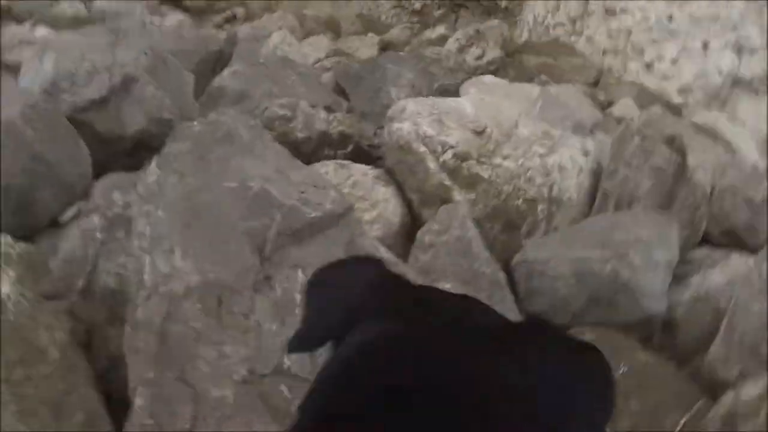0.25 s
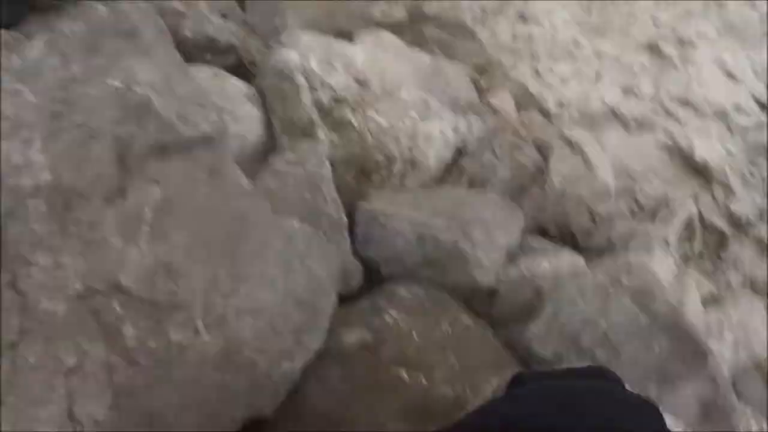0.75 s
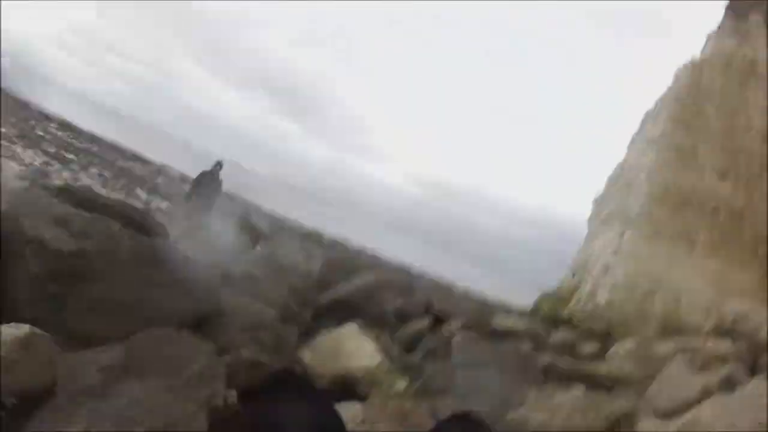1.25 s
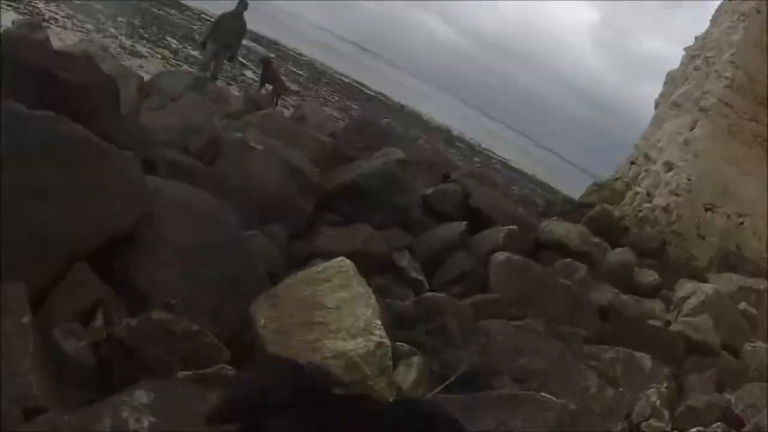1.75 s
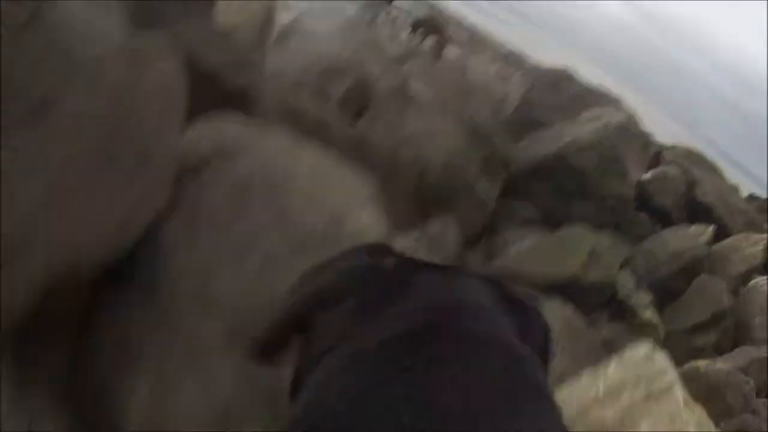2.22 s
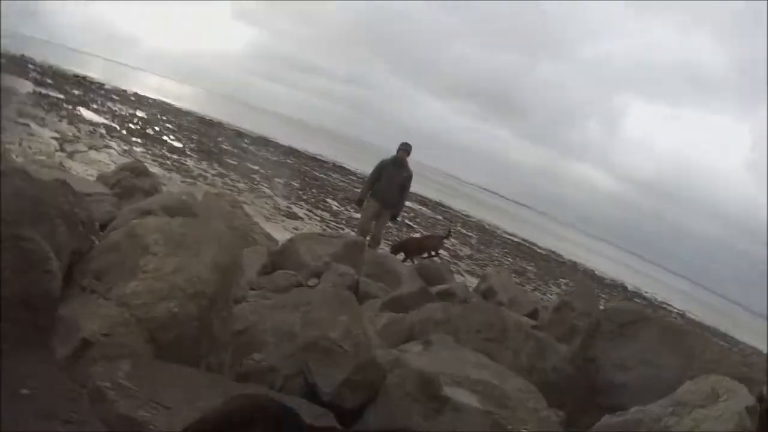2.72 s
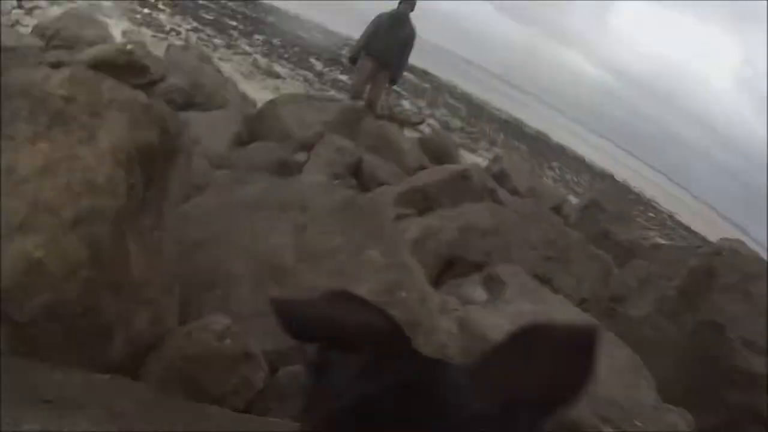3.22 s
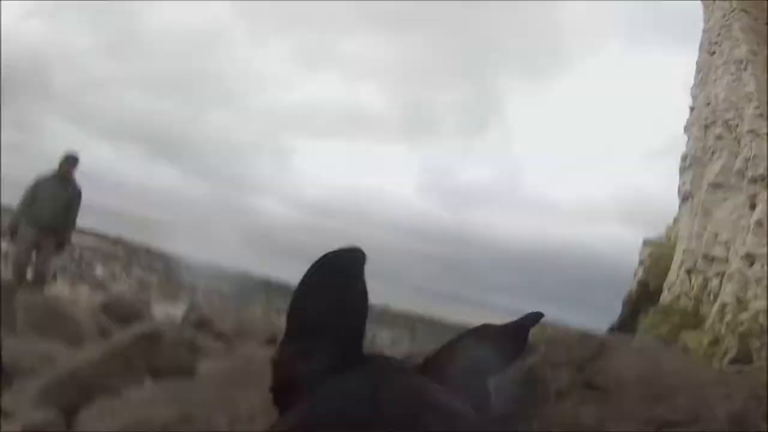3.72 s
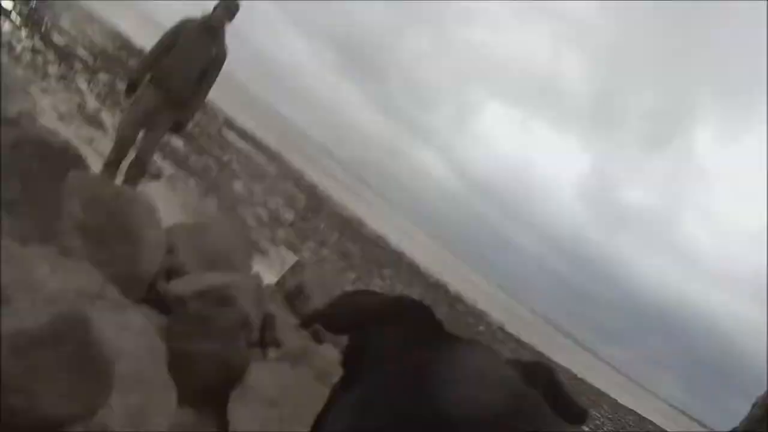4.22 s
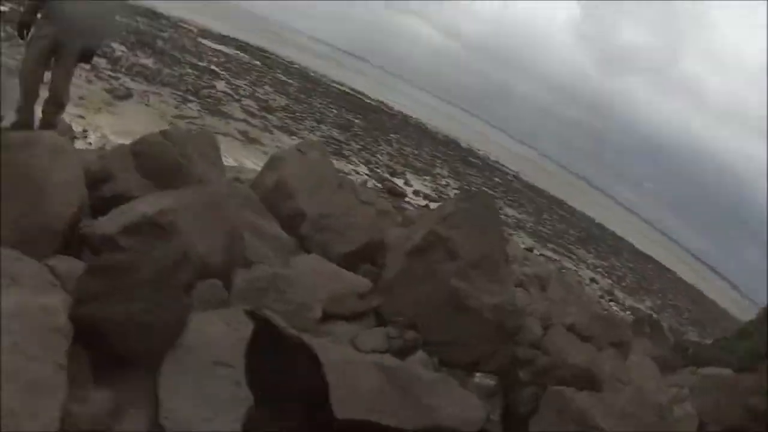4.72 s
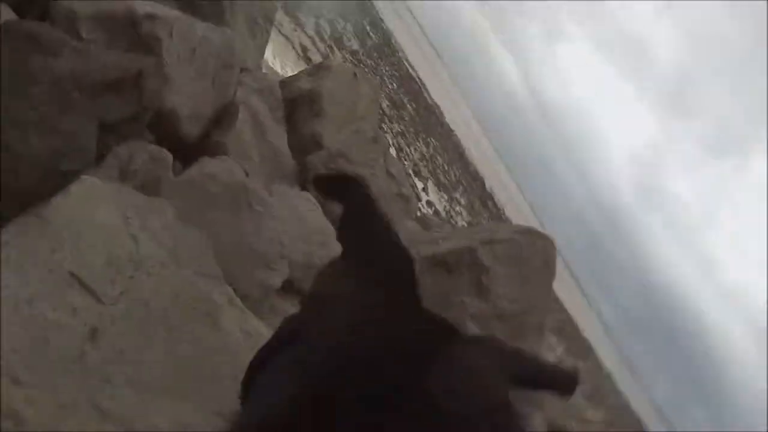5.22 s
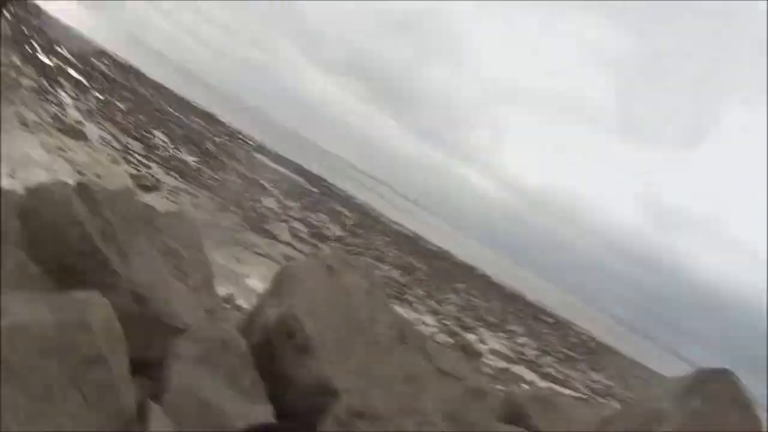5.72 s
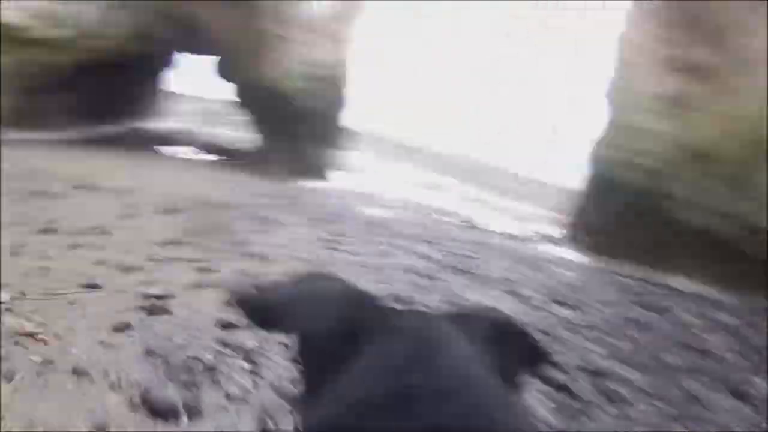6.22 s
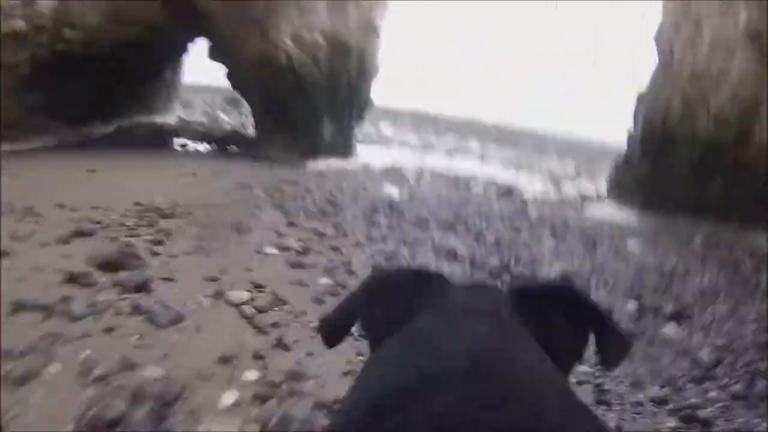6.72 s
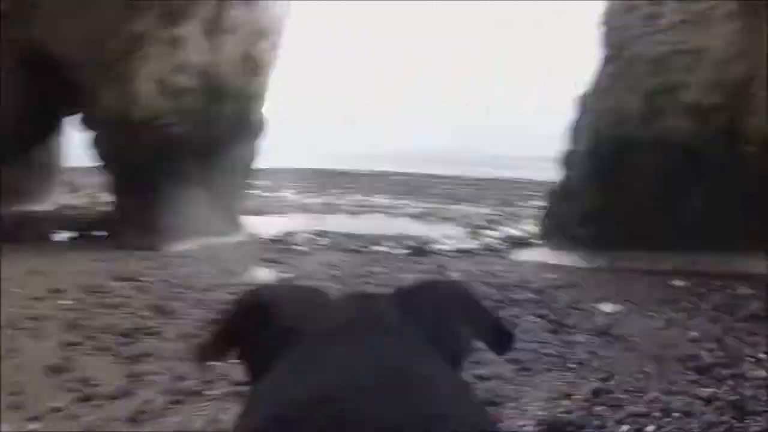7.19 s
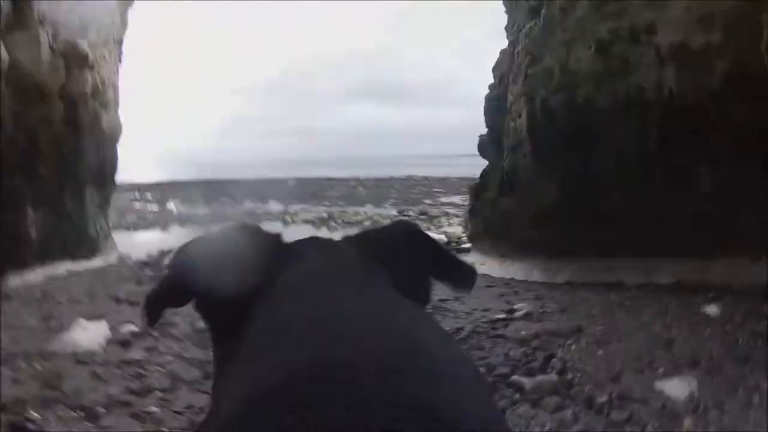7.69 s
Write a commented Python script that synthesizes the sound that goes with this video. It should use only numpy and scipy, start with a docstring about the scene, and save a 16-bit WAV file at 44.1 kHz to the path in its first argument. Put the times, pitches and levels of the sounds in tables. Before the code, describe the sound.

A camera in a plastic housing on a running dog's harness thumps deep and uneven, with knocks, clicks and strap rubbing, broken by two brief dropouts.

```python
"""On boulders, then shingle: a dog runs with a camera in a closed housing riding on its harness.
Each stride thumps the housing as a damped low swing; the mount knocks as pressure cusps with a hollow ring,
and loose plastic clicks as bursts of resonant taps. Fur and straps rub as coloured stick-slip grains.
A slow start with sway, rustle and fading hiss comes first; pebbles clack late as short pitched noise.
Twice the level dips briefly."""
import sys
import numpy as np
from scipy import signal
from scipy.fft import rfft, irfft
from scipy.io import wavfile
from scipy.ndimage import uniform_filter1d

SR = 44100
rng = np.random.default_rng(int(sys.argv[2]) if len(sys.argv) > 2 else 0)


def unload_audio(sound):
    """Save the sound as a 16-bit wav file, at the path given as the first command line argument."""
    columns = np.transpose(np.atleast_2d(sound))
    # keep every value between -1 and 1, then stretch to whole-number steps
    steps = np.round(np.clip(columns, -1, 1) * 32767)
    wavfile.write(sys.argv[1], SR, steps.astype(np.int16))


N = 350595
TIME = np.arange(N) / SR

# Jolts of the housing: [crest t/s, peak level/dB, swing f/Hz, cycles for the load to fall to 0.4]
JOLTS = [(0.290, -30.5, 77, 0.83), (0.371, -33, 86, 0.62), (1.269, -25.5, 25, 0.27),
         (1.347, -16.5, 48.5, 2), (1.773, -8.5, 35.4, .8), (1.795, -28, 110, 1.1), (1.86, -31.5, 117, 4.1),
         (2.237, -2.5, 40.6, 0.95), (2.27, -5, 52, 0.3), (2.312, -16.5, 75, 0.96), (2.468, -31, 110, 1.1),
         (2.474, -18, 27, 0.85), (2.571, -20.5, 109, 0.85), (2.721, -13, 43.6, 0.82),
         (2.936, -22.5, 91, 0.8), (2.955, -13.5, 21, 1), (3.193, 0.5, 30.7, 0.44), (3.338, -7.5, 31, .7),
         (3.375, -8.5, 31.5, 0.55), (3.585, -16.5, 47.6, 1.74), (3.605, -29, 104, 0.97),
         (3.728, -19.5, 22.2, 2.8), (3.897, 0, 41.5, 0.76), (4.032, -18, 84, 1.45), (4.118, -20.5, 50, .6),
         (4.146, -37, 195, 1.2), (4.175, -18, 42, 0.5), (4.412, -29, 102, 2.2), (4.532, -4.5, 35.8, 0.6),
         (4.555, -24, 110, 1.6), (4.597, -13.5, 46.6, 0.86), (4.893, -6.5, 51, 0.85),
         (4.963, -14, 31, 0.31), (5.392, -27.5, 122, 3.7), (5.404, -8.5, 51.5, 0.59),
         (5.656, -21, 24.5, 0.72), (6.271, -40, 122, 0.77), (6.468, -23, 22.7, 1.04),
         (6.672, -20.5, 101, 0.76), (6.676, -10.5, 23.6, 1.07), (6.861, -15.5, 20.2, 2.1),
         (7.082, -5.5, 30, 0.5), (7.266, -9.5, 19, 1.6), (7.488, -5.5, 34.4, 0.77), (7.713, -4, 26, 1.08),
         (7.941, 0, 30, 1.3)]
# Scuff of the straps under a jolt, relative spectrum: [f/Hz, level/dB per Hz]
SCUFF_SPECTRUM = [(40, -17), (130, 10.5), (200, -17), (400, -7.5), (800, -23.5), (1400, -14.5),
                  (3000, -22.5), (15000, -59.5)]
# Pace of the run, before load and trims: [t/s, shaking level/dB, rubbing level/dB, fine friction level/dB]
PACE = [(1.0, -54, -86.5, -103), (1.16, -43.5, -73, -85), (1.26, -40, -65.5, -83),
        (1.45, -37.5, -65.5, -82), (1.72, -33, -54, -72), (1.92, -36.5, -52.5, -72.5),
        (2.14, -36.5, -59, -71.5), (2.38, -33, -65, -77), (2.62, -30, -57.5, -73.5), (2.9, -26.5, -54, -68),
        (3.3, -30, -53, -67.5), (3.82, -29.5, -56.5, -67.5), (4.0, -33, -61, -76), (4.27, -30, -59, -70.5),
        (4.5, -27, -54, -68), (5.1, -33, -57, -72), (5.93, -40.5, -66, -80), (6.05, -60, -74.5, -100),
        (6.2, -58, -89, -101), (6.29, -44.5, -77.5, -82.5), (6.47, -40, -64.5, -75.5),
        (7.1, -26.5, -54.5, -66), (7.65, -30, -56, -66.5), (7.89, -31.5, -60, -67)]
# Fur and straps drag harder on the shell, around and between landings:
# [peak t/s, level/dB above steady rubbing, t/s to 1/e]
DRAGS = [(1.25, 3, 0.021), (1.342, 5.5, 0.03), (1.81, 1.5, 0.13), (2.17, 10, 0.075), (2.39, 6.5, 0.062),
         (2.586, 5.5, 0.032), (2.70, 2, 0.0089), (2.917, 2.5, 0.018), (3.408, 2, 0.0085), (3.57, 3, 0.028),
         (3.85, 9.5, 0.028), (4.188, 4, 0.011), (4.337, 1, .01), (4.933, 3.5, 0.0092), (5.425, 4, 0.055),
         (5.654, 5.5, 0.012), (6.28, 8, .04), (6.891, 5.5, 0.021), (7.237, 3.5, 0.02), (7.492, 5, 0.016),
         (7.727, 3.5, 0.18)]
# Body shake, relative spectrum: [f/Hz, level/dB per Hz]
SHAKE_SPECTRUM = [(8, -21), (20, 4.5), (30, 3.5), (55, -4.5), (90, -12.5), (125, -17.5), (170, -27.5),
                  (250, -39), (500, -57.5), (1500, -100)]
# Rubbing on the hollow shell, relative spectrum: [f/Hz, level/dB per Hz]
RUB_SPECTRUM = [(100, -6.5), (250, -2), (450, -3.5), (750, -8), (1060, -10), (1250, 2), (1480, -0.5),
                (1750, -8), (2250, -2.5), (2800, -17), (3600, -22.5), (5000, -28), (15000, -65)]
# Fine friction, relative spectrum: [f/Hz, level/dB per Hz]
FRICTION_SPECTRUM = [(1500, -26.5), (3400, 3.5), (4300, -2), (4900, -1), (6100, -8), (7000, -5),
                     (8300, -10), (10000, -11), (11800, -14), (13200, -17.5), (15500, -32.5)]
# Straps slide over the shell as a stride lands: [peak t/s, level/dB, build-up t/s from 1/e]
SLIDES = [(1.358, -63.5, .045), (1.765, -64, 0.023), (2.205, -54, 0.033), (3.886, -51.5, 0.025),
          (7.020, -61, .015), (7.063, -56, 0.03), (7.500, -66, 0.011)]
# Strap slide, relative spectrum: [f/Hz, level/dB per Hz]
SLIDE_SPECTRUM = [(600, -19), (1400, -2.5), (2300, 8), (2900, -3.5), (3600, 3.5), (4300, -1.5),
                  (4900, -6.5), (6500, -17), (13000, -30.5)]
# Knocks of the mount: [t/s, push level/dB, hollow ring level/dB]
KNOCKS = [(1.040, -52, -65), (1.049, -49, -60), (1.074, -43, -63), (1.241, -43, -56), (1.369, -31.5, -44),
          (1.375, -27.5, -61), (1.792, -26, -43), (2.2198, -18.5, -65), (2.238, -25, -36),
          (2.264, -34, -45), (2.27, -24.5, -39.5), (2.5669, -33, -34.5), (2.694, -43, -42),
          (2.721, -26, -60), (3.215, -32, -38), (3.336, -55, -34.5), (3.398, -50, -35.5), (3.884, -8, -35),
          (3.898, -21.5, -34), (4.342, -47, -46), (4.531, -40, -37), (4.915, -28, -38), (5.39, -37, -42),
          (5.413, -27, -49), (5.641, -46, -45.5), (6.672, -23, -31), (7.007, -54, -38.5), (7.068, -25, -35),
          (7.484, -23.5, -33), (7.938, -20, -29)]
# Shell modes in a knock, relative levels before scatter: [f/Hz, level/dB, t60 t/s]
KNOCK_MODES = [(1292, 1.5, 0.02), (1472, -6.5, 0.021), (1480, -19.5, 0.0079), (2060, -8.5, 0.0066)]
# Click bursts of the buckle and hinge: [t/s, first tap level/dB before trim, burst length t/s]
CLICKS = [(1.039, -67, .004), (1.072, -61, .004), (1.238, -53.5, .013), (1.372, -52, .004),
          (1.777, -54, .004), (2.2304, -46, .004), (2.237, -43, .013), (2.2667, -41.5, .013),
          (2.432, -51, .004), (2.476, -45.5, .004), (2.725, -39, .022), (2.9592, -46, .004),
          (3.036, -41, .004), (3.0525, -39.5, .004), (3.2017, -31, .004), (3.211, -32, .004),
          (3.6265, -44.5, .022), (3.7287, -33.5, .031), (3.8943, -36, .004), (4.338, -44.5, .013),
          (4.4666, -42.5, .013), (4.7331, -40.5, .004), (4.784, -44.5, .004), (4.937, -47.5, .004),
          (5.03, -48.5, .004), (5.5615, -51, .004), (6.3695, -62, .004), (6.8834, -44, .004),
          (6.9698, -48, .004), (7.091, -46, .022), (7.275, -47.5, .013), (7.519, -43.5, .004),
          (7.555, -36, .004), (7.7225, -44.5, .004), (7.934, -32, .004)]
# Shell modes in a click, relative levels before scatter: [f/Hz, width f/Hz, level/dB]
CLICK_MODES = [(2165, 135, 11.5), (3590, 1030, -4), (4830, 154, 3), (5250, 510, -2.5), (7050, 400, -3.5),
               (8840, 1500, -15), (11370, 1200, -6.5)]
# Pebbles clack under the paws: [t/s, starting level/dB, pitch f/Hz, decay t/s to 1/e]
PEBBLES = [(7.006, -51, 4860, 0.0045), (7.051, -49.5, 4750, 0.0064), (7.215, -58, 4630, 0.0046),
           (7.229, -49.5, 4670, 0.0062), (7.397, -42, 7850, 0.0013), (7.467, -43.5, 4340, 0.0033)]
# Sway before the run, coming to rest: [t/s, shaking level/dB]
SWAY = [(0.03, -35), (.2, -49), (.38, -39), (.52, -62), (.9, -69.5)]
# Harness rustles in the slow first steps: [peak t/s, level/dB, t/s to 1/e]
RUSTLES = [(0.123, -68, 0.092), (0.294, -64.5, 0.024), (.40, -76.5, 0.11), (.58, -71, 0.055)]
# Harness rustle, relative spectrum: [f/Hz, level/dB per Hz]
RUSTLE_SPECTRUM = [(120, -4), (300, -14), (700, -10), (1400, -17), (1850, -1), (2150, -6), (2500, -15),
                   (3100, -3.5), (4000, -22), (6500, -23), (9000, -29), (15000, -34)]
# Air around the housing, relative spectrum: [f/Hz, level/dB per Hz]
AIR_SPECTRUM = [(100, -3.5), (250, 0), (700, -10), (1400, -13.5), (2000, -10.5), (3100, -15.5), (4200, -20),
                (7000, -26), (15000, -37)]
# Brief dips in level: [start t/s, end t/s]
DIPS = [(0.911, 1.003), (6.118, 6.205)]

# after each jolt the housing drops back once, lighter and quicker
REBOUND_S, REBOUND_DB, REBOUND_FREQ_RATIO = 0.031, -15, 1.15
# the harness tightens as the weight comes down and lets go; a second, slack swell is subtracted
TIGHTEN_S, LET_GO_S, SLACK_SHIFT_S, SLACK_S, SLACK_SHARE = 0.03, 0.04, 0.096, 0.043, 0.19
LOAD_POWER = 0.67  # the load on the harness grows more slowly than the jolt
# within a burst the parts chatter, each tap weaker than the last
CHATTER_GAP_S, CHATTER_FADE_DB_PER_S = 0.009, 399.5
# the hiss of air fades steadily through the slow start
AIR_DB, AIR_FADE_DB_PER_S = -66, 24.5
BAND_EDGE_HZ = 15800


def jolts(lead_cycles=0.22, rise_s=0.0012, jolt_db=0, scuff_db=-40):
    """The housing swings on its harness, rebounds once and settles; the straps scuff as it does."""
    swing, strain = np.zeros(N), np.zeros(N)
    before = 0.1  # seconds computed ahead of the crest
    t = np.arange(SR // 2) / SR - before
    rebounds = [(s + REBOUND_S, db + REBOUND_DB, hz * REBOUND_FREQ_RATIO, cycles)
                for s, db, hz, cycles in JOLTS]
    for s, db, hz, cycles in JOLTS + rebounds:
        # the load comes on part of a cycle before the crest, then dies away
        onset = (1 + np.tanh((t + lead_cycles / hz) / (2 * rise_s))) / 2
        load = amp(db) * onset / np.cosh(t * hz / cycles * 1.59)
        add(swing, s - before, load * np.cos(2 * np.pi * hz * t))
        add(strain, s - before, load)
    scuff = strain * coloured(slips(1500, 3.8), SCUFF_SPECTRUM)
    return amp(jolt_db) * swing + amp(scuff_db) * scuff


def running(shake_db=0, rub_db=1.24, friction_db=0, flutter_db=0.9, lurch_db=3.0, wobble_db=1.5,
            shake_load_db=7, rub_load_db=6, friction_load_db=3):
    """The body shakes the camera while fur and straps drag over the hollow shell, all harder under load."""
    shake, rub, friction = levels(PACE)
    load = harness_load()
    drag_db = sum(db * swell(s, half, half) for s, db, half in DRAGS)
    grip = amp(flutter_db * wander(38))  # contact pressure flutters
    lurch = wander(14)  # shaking and rubbing come in lumps

    shake_gain = amp(shake_db + shake_load_db * load + lurch_db * lurch) * shake
    rumble = shake_gain * coloured(rng.standard_normal(N), SHAKE_SPECTRUM)

    rub_gain = amp(rub_db + rub_load_db * load + wobble_db * lurch + drag_db) * rub
    rubbing = rub_gain * coloured(slips(5000, 0.35), RUB_SPECTRUM)

    friction_gain = amp(friction_db + friction_load_db * load) * friction
    fizz = friction_gain * coloured(slips(12000, 2.2), FRICTION_SPECTRUM)
    return rumble + grip * (rubbing + fizz) + rattle(friction)


def harness_load():
    """Pressure on the harness: a swell at each jolt, less a smaller slack swell."""
    load = np.zeros(N)
    for s, db, _, _ in JOLTS:
        tighten = swell(s, TIGHTEN_S, LET_GO_S)
        slack = SLACK_SHARE * swell(s + SLACK_SHIFT_S, SLACK_S, SLACK_S)
        load += amp(LOAD_POWER * db) * (tighten - slack)
    return load


def rattle(friction, per_s=24, rattle_db=8, spread_db=3, treble_db=-4):
    """Faint chance ticks of the loose parts, stronger when the fine friction is stronger."""
    out = np.zeros(N)
    draws = rng.random((400, 3))
    for place, size, chance in draws:
        tap = tick(treble_db) * amp(rattle_db - spread_db * np.log(max(size, 0.02)))
        if chance < per_s * TIME[-1] / len(draws):
            add(out, place * TIME[-1], tap * friction[int(place * N)])
    return out


def slides(slide_db=0, release_s=0.035):
    """Strap drag builds while the dog's weight comes down and stops as the strap grips."""
    drag = sum(amp(db) * swell(s, build, release_s) for s, db, build in SLIDES)
    return amp(slide_db) * drag * coloured(slips(5400, 2.8), SLIDE_SPECTRUM)


def knocks(push_db=0, hollow_db=0, contact_s=0.00079, tip_s=0.00004):
    """The mount meets its stop: pressure climbs to a sharp cusp and lets go, and the hollow shell rings."""
    out = np.zeros(N)
    before = 0.02  # seconds computed ahead of the cusp
    t = np.arange(SR // 20) / SR - before
    cusp = -np.exp((tip_s - np.hypot(t, tip_s)) / contact_s)
    for s, db, ring_db in KNOCKS:
        add(out, s - before, amp(db + push_db) * cusp)
        add(out, s, amp(ring_db + hollow_db) * ring(KNOCK_MODES, 0.024))
    return out


def ring(modes, scatter):
    """One blow on the hollow shell: decaying modes, their balance and tuning varied by chance, at peak 1."""
    t = np.arange(SR // 20) / SR
    hz, db, t60 = np.transpose(modes)[:, :, None]
    weight, detune, phase = rng.standard_normal((3, len(modes), 1))
    waves = np.sin(2 * np.pi * (hz * (1 + scatter * detune) * t + phase))
    decay = np.exp(-np.log(1000) * t / t60)
    sound = (amp(db + 2 * weight) * decay * waves).sum(0)
    sound *= 1 - np.exp(-t / 0.00017)  # soften the onset
    return sound / abs(sound).max()


def clicks(click_db=3.5, bounce_db=-10, treble_db=-3.5, uneven_db=4.5, touch_db=-14):
    """Hard plastic parts touch lightly, strike and chatter; each tap bounces once within a few milliseconds."""
    out = np.zeros(N)
    for s, db, length in CLICKS:
        touch_s = s - CHATTER_GAP_S * rng.uniform(0.5, 0.88)
        add(out, touch_s, amp(db + touch_db) * tick(treble_db))
        for delay in np.arange(0, length, CHATTER_GAP_S):
            tap_db = db - CHATTER_FADE_DB_PER_S * delay
            bright_db = treble_db + uneven_db * rng.standard_normal()
            add(out, s + delay, amp(tap_db + click_db) * tick(bright_db))
            bounce_s = s + delay + rng.uniform(0.002, 0.003)
            add(out, bounce_s, amp(tap_db + bounce_db) * tick(bright_db))
    return out


def tick(treble_db, lag_s=0.0014, scatter=0.0048, uneven_db=3.5, roll_hz=12600):
    """One tap on the shell, at peak 1: bending waves carry treble fastest, so low modes arrive later."""
    f = np.fft.rfftfreq(SR // 20, 1 / SR)
    hz, width, db = np.transpose(CLICK_MODES)[:, :, None]
    weight, detune = rng.standard_normal((2, len(hz), 1))
    sign = (-1) ** np.arange(len(hz))[:, None]  # neighbouring modes oppose
    gain = amp(db + uneven_db * weight + treble_db * (hz > 9000)) * sign
    tuned = hz * (1 + scatter * detune)
    modes = (gain * 1j * f * width / (tuned ** 2 - f ** 2 + 1j * f * width)).sum(0)
    travel = np.exp(-4j * np.pi * lag_s * np.sqrt(hz[0] * f))  # lag_s is the delay at the lowest mode
    sound = irfft(modes * travel / np.hypot(1, (f / roll_hz) ** 7))
    return sound / abs(sound).max()


def pebbles(pebble_db=0, spread=0.24, grit_db=-13):
    """Stones knock together: a short gritty noise burst around one pitch."""
    out = np.zeros(N)
    t = np.arange(SR // 20) / SR
    for s, db, hz, decay in PEBBLES:
        low, high = hz * (1 - spread), hz * (1 + spread)
        stone = [(500, -30), (1500, grit_db), (low, grit_db), (hz, 0), (high, grit_db), (15000, -36)]
        burst = np.exp(-t / decay) * coloured(rng.standard_normal(len(t)), stone)
        add(out, s, amp(db + pebble_db) * burst)
    return out


def setting_off():
    """Slow first steps: a light sway that dies as the dog stops, a thin harness rustle, a fading hiss of air."""
    sway_gain, = levels(SWAY)
    sway = sway_gain * coloured(rng.standard_normal(N), SHAKE_SPECTRUM)
    hiss_gain = amp(AIR_DB - AIR_FADE_DB_PER_S * TIME)
    hiss = hiss_gain * coloured(rng.standard_normal(N), AIR_SPECTRUM)
    rustle_gain = sum(amp(db) * swell(s, half, half) for s, db, half in RUSTLES)
    rustle = rustle_gain * coloured(slips(8000, 0.8), RUSTLE_SPECTRUM)
    return sway + hiss + rustle


def slips(per_s, spread_db):
    """A dense train of tiny stick-slip releases of uneven size, at rms 1."""
    size = amp(spread_db * np.minimum(rng.exponential(1, N), 4))
    happens = rng.random(N) < per_s / SR
    return evened(size * rng.standard_normal(N) * happens)


def wander(hz):
    """Slow chance movement below a given rate, at rms 1."""
    f = np.fft.rfftfreq(N, 1 / SR)
    return evened(irfft(rfft(rng.standard_normal(N)) * (f < hz), N))


def swell(s, rise, fall):
    """A smooth hump of height 1 at time s; rise and fall are seconds to 1/e."""
    return np.exp(-((TIME - s) / np.where(TIME < s, rise, fall)) ** 2)


def levels(rows):
    """Each dB column of a curve as a gain for every sample."""
    s, *columns = np.transpose(rows)
    return [amp(np.interp(TIME, s, db)) for db in columns]


def coloured(x, points):
    """Shapes x by a curve of (Hz, dB) points, at rms 1."""
    hz, db = np.transpose(points)
    f = np.fft.rfftfreq(len(x), 1 / SR)
    gain = amp(np.interp(np.log(f + 1), np.log(hz), db))
    return evened(irfft(rfft(x) * gain, len(x)))


def evened(x):
    """Scales to rms 1."""
    return x / np.sqrt(np.mean(x ** 2) + 1e-20)


def amp(db):
    """Decibels to gain."""
    return 10 ** (np.asarray(db) / 20)


def add(mix, s, sound):
    """Mixes a sound in at time s, cut off at the end of the mix."""
    part = mix[max(round(s * SR), 0):][:len(sound)]
    part += sound[:len(part)]


def scene():
    """The slow start gives way to the run in the middle of the first dip; the other layers go on top."""
    harness = np.where(TIME < np.mean(DIPS[0]), setting_off(), running())
    return (harness + jolts() + slides() + knocks() + clicks() + pebbles())[None]


def record(dry, dip_db=-30):
    """The microphone leaks steady pressure; then the brief dips, the overload ceiling and the band limit."""
    leak = signal.butter(1, 3, "high", fs=SR, output="sos")
    sound = signal.sosfilt(leak, dry)
    live = np.ones(N)
    for start, end in DIPS:
        live[(TIME > start) & (TIME < end)] = amp(dip_db)
    sound = np.clip(sound * uniform_filter1d(live, size=200), -1, 1)  # 200 samples soften the dip edges
    band = signal.firwin(511, BAND_EDGE_HZ, window=("kaiser", 9), fs=SR)
    return signal.oaconvolve(sound, band[None], "same")


dry = scene()
out = record(dry)
unload_audio(out)
```